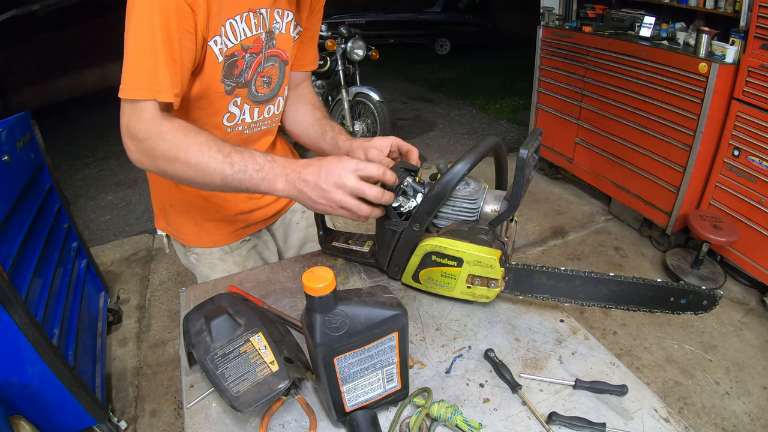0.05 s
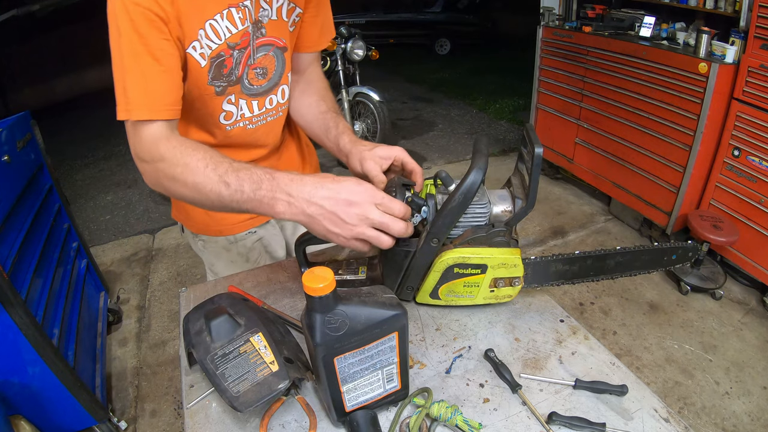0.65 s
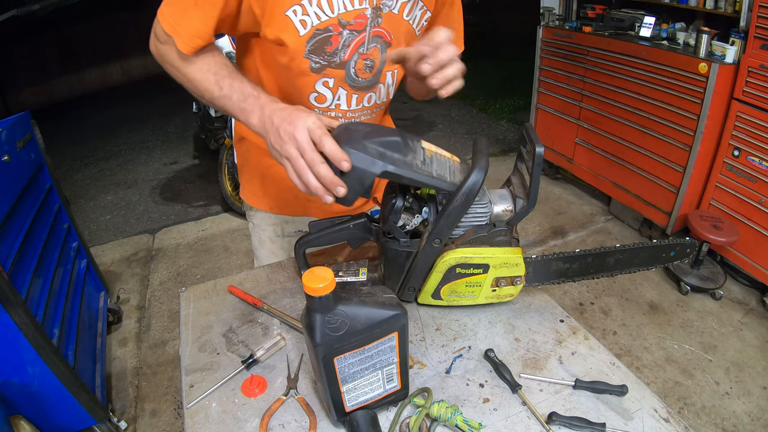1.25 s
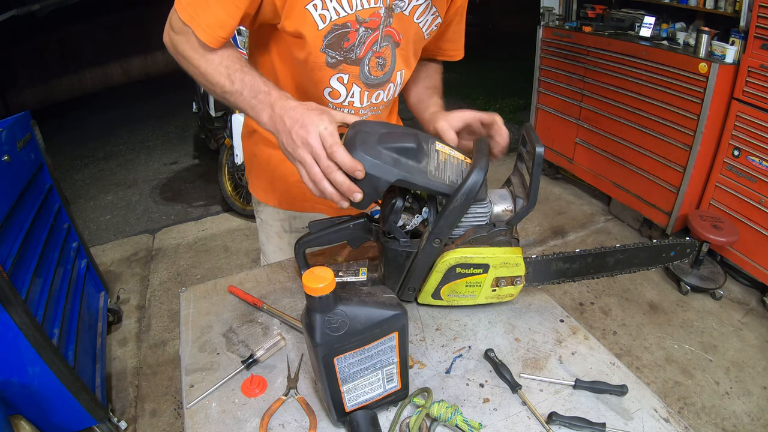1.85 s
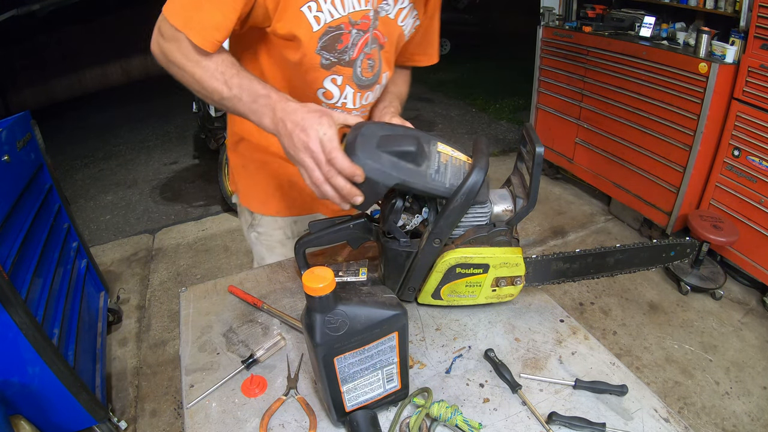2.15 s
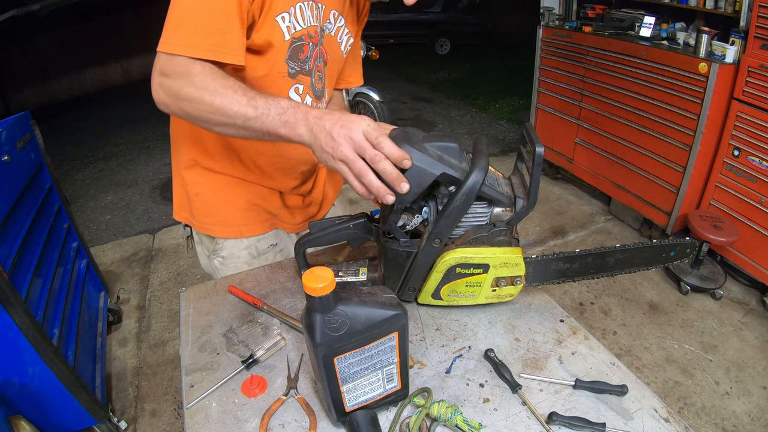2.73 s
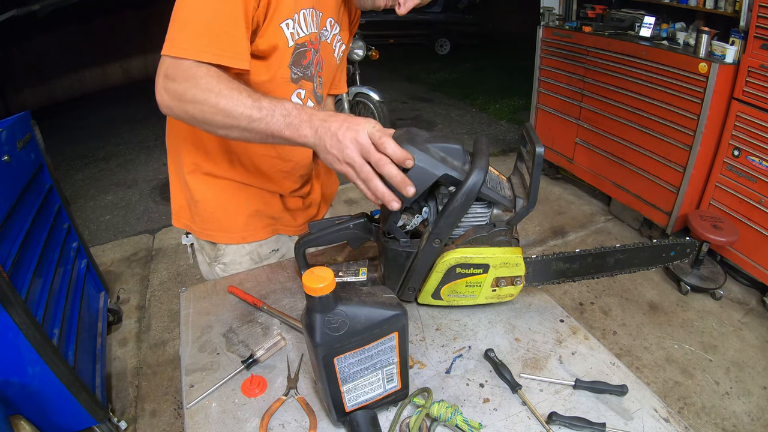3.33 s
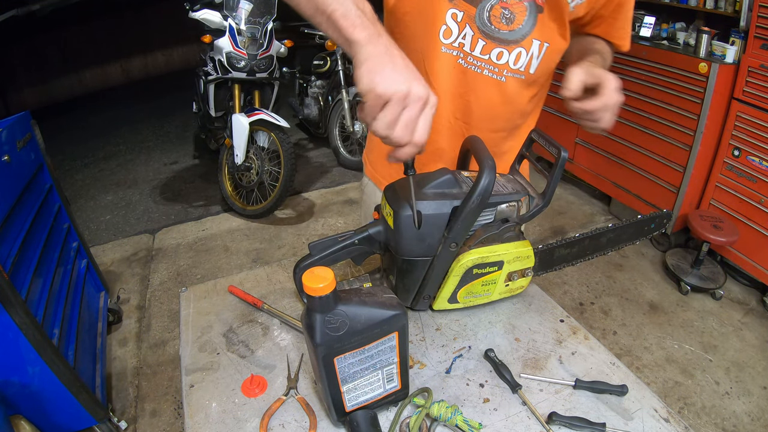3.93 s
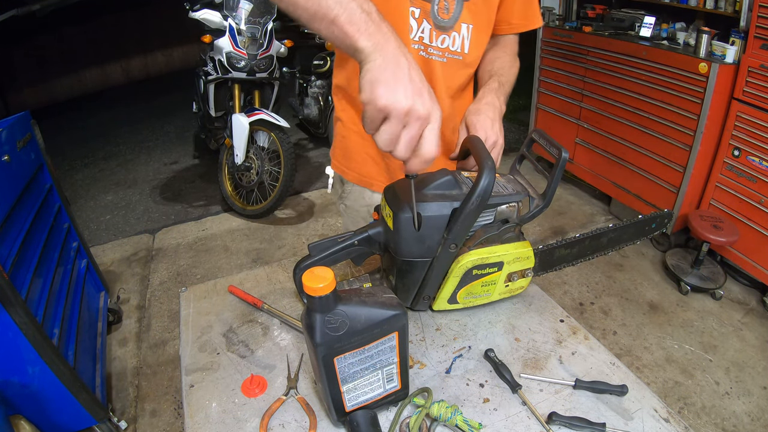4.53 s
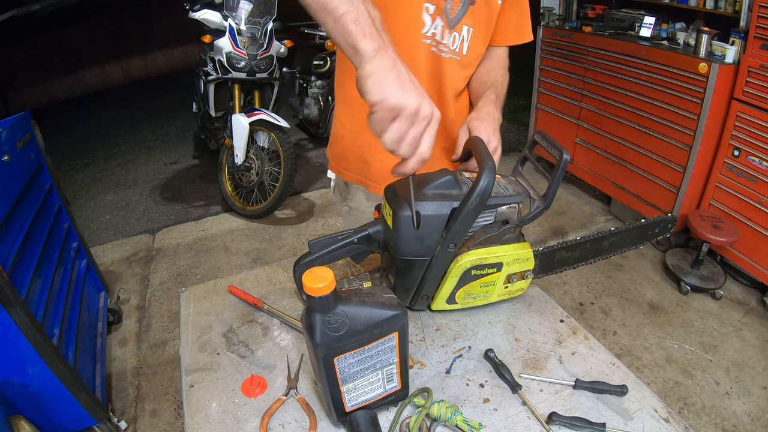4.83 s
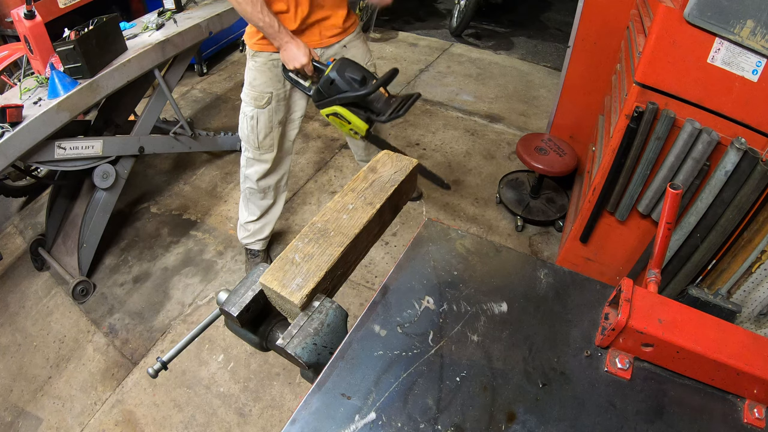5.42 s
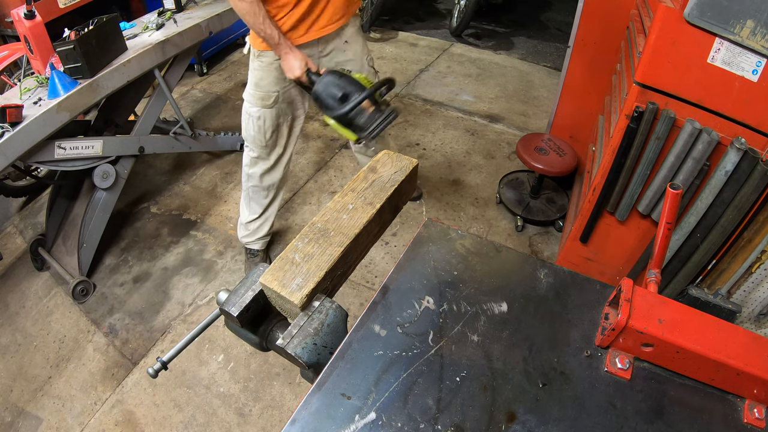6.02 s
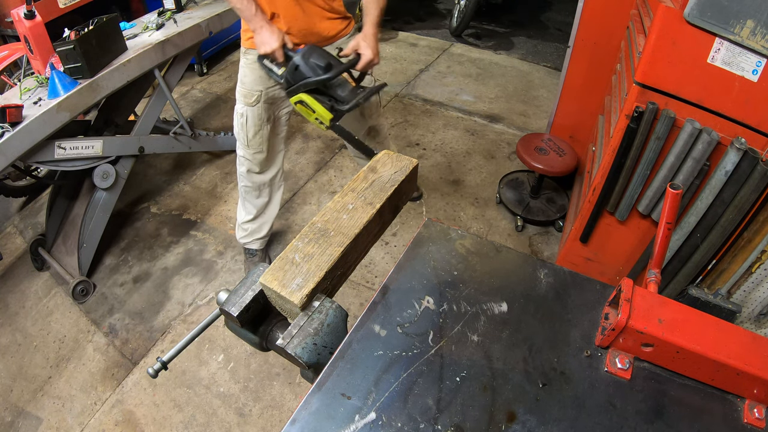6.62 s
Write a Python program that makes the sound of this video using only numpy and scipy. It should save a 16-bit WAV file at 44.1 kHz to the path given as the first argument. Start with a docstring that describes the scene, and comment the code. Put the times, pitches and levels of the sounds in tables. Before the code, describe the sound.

A faint, low hum of air fills a garage with a short echo. From the start, a plastic cover is handled on a chainsaw nearby, with light ticks and soft rubs. Sharp, hollow clacks come at about 1.3 and 2.1 seconds, followed by squeaky scrapes, more knocks and dull bumps of the saw on the bench until 3 seconds. From about 3.5 to 5 seconds the cover is screwed down with small clicks and quiet scraping, a low thump near 3.7 and a sharp knock at 5.1. At 5.3 seconds the starter cord is pulled: the engine chuffs and rattles without firing, and the cord winds back with a thin whizz. A clunk and a second, stronger pull follow at 5.9. Around 6.2 seconds the two-stroke engine catches and runs at a loud, fast idle with rattling casing and chain until the end, near 6.7 seconds.

```python
"""A two-stroke chainsaw starts in a garage: the first pull of the cord only chuffs and the cord winds
back; on the second the engine catches and runs at a fast, rattling idle. Each turn of the engine sends
a puff of gas through the muffler and shakes the metal casing and the chain.
Before the pulls, a plastic cover is fitted and screwed down: knocks make it ring, rubbing parts scrape
and squeak, and the saw bumps on the bench. The walls echo over a faint hum of air."""
import sys
import numpy as np
from scipy import signal
from scipy.fft import rfft, irfft
from scipy.io import wavfile
from scipy.ndimage import uniform_filter1d

SR = 44100
rng = np.random.default_rng(int(sys.argv[2]) if len(sys.argv) > 2 else 0)


def master(y):
    """Save y as 16-bit WAV."""
    cut = np.clip(np.atleast_2d(y).T, -1, 1)
    pcm = np.round(cut * 32767)  # scale
    wavfile.write(sys.argv[1], SR, pcm.astype(np.int16))


N = 294147
T = np.arange(N) / SR


def engine():
    """The turning engine makes three sounds: unfired chuffs, fired barks and a metal rattle."""
    speed, burn, uneven, exhaust_db, rattle_db = crank()
    pulses = exhaust_pulses(speed, uneven)
    gas = signal.fftconvolve(pulses, np.exp(-T[:2048] / .009))[:N]  # the flow dies away after each puff
    chuff = amp(exhaust_db) * unfired_chuff(pulses, gas, burn, uneven)
    bark = amp(exhaust_db - .5) * fired_bark(pulses, burn)
    return chuff, bark, casing_rattle(pulses, gas, burn, rattle_db)


# Pulls of the starter cord: t/s, spin-up/s, hold/s, coast/s, first speed/Hz, top speed/Hz,
# exhaust level/dB, rattle level/dB, surge depth/dB (a speed in Hz is turns a second)
PULLS = [(5.27, .04, .075, .27, 50.25, 64.1, -21, -36, 3.2),
         (5.913, .085, .08, .5, 41.96, 75.05, -18, -30.5, 0.23)]
# The engine under its own power: t/s, speed/Hz
IDLE_SPEED = [(6.25, 76), (6.286, 82.3), (6.33, 87.3), (6.424, 86), (6.544, 84.3), (6.624, 80.8),
              (6.67, 85)]
SURGE_HZ, SURGE_LAG_S = 9.6, 0.02  # a jerky pull comes in surges
CRANK_HZ = 71.9  # the speed at which the levels of the pulls apply
CATCH_S, CATCH_RISE_S = 6.155, .11  # the fuel starts to burn; time until the engine carries itself
SMOOTH_HZ, IDLE_EXHAUST_DB, IDLE_RATTLE_DB = 86.52, -15, -24  # smooth running and its levels


def crank():
    """A pull spins the engine up and lets it coast, until the fuel catches (burn goes from 0 to 1)."""
    speed, exhaust_db, rattle_db = np.zeros((3, N))
    for s, rise, hold, coast, first_hz, top_hz, puff_db, shake_db, surge_db in PULLS:
        i = int(s * SR)
        t = T[:N - i]
        speed[i:] = np.interp(t, np.cumsum([0, rise, hold, coast]), [first_hz, top_hz, top_hz, 0])
        surge = surge_db * np.cos(2 * np.pi * SURGE_HZ * (t - SURGE_LAG_S))
        exhaust_db[i:], rattle_db[i:] = puff_db + surge, shake_db + surge
    caught = np.clip((T - CATCH_S) / CATCH_RISE_S, 0, 1)
    speed = (1 - caught) * speed + caught * np.interp(T, *np.transpose(IDLE_SPEED))
    burn = caught ** 2
    # Pulled, it gets louder and stumbles more with speed. Running, it stumbles more as the speed sags.
    doublings = np.log2(speed / CRANK_HZ + 1e-9)
    sag_hz = np.maximum(SMOOTH_HZ - speed, 0)
    uneven = (1 - burn) * .7 * (speed / CRANK_HZ) ** 2 + burn * .022 * sag_hz
    exhaust_db = (1 - burn) * (exhaust_db + 11 * doublings) + burn * IDLE_EXHAUST_DB
    rattle_db = (1 - burn) * (rattle_db + 9.5 * doublings) + burn * (IDLE_RATTLE_DB - 0.56 * sag_hz)
    return speed, burn, uneven, exhaust_db, rattle_db


def exhaust_pulses(speed, uneven, stall_hz=18):
    """One pulse each time the exhaust opens; a stumbling engine also blows between turns."""
    out = np.zeros(N + SR // 10)
    for s, *_ in PULLS:
        for late, strong, extra, when in rng.standard_normal((80, 4)):
            i = int(s * SR)
            if i >= N or speed[i] < stall_hz:
                break
            period = np.exp(.13 * uneven[i] * late) / speed[i]
            out[i] += amp((-1.3 + 2.8 * uneven[i]) * strong)
            between = i + int(SR * period * (.5 + .2 * np.tanh(when)))
            out[between] += .6 * uneven[i] * np.tanh(extra)
            s += period
    return out[:N]


# Tone of a fired puff: f/Hz, level/dB
BARK_TONE = [(40, -13), (85, -0.5), (125, -20), (172, -2.5), (255, 1), (340, -7.5), (425, -4), (510, -8),
             (600, -18), (690, -26), (860, -21.5), (1000, -44), (1400, -37), (2200, -23.5), (4000, -30)]
# Notes that build up between floor, walls and cabinets: f/Hz, width/Hz, level/dB
ROOM_NOTES = [(119, 11, 1), (195, 39, 7.5), (262.4, 4.2, 10.5), (333.7, 3.2, 10.5), (421.5, 9.9, 3.5),
              (481.5, 24, 9.5), (595.4, 5.5, 12), (668, 16, 17), (770, 15, 10.5), (863.6, 9.7, 14.5)]


def fired_bark(pulses, burn):
    """Puffs of burnt fuel ring the muffler and set the room ringing too."""
    bark = band(colour(-pulses, BARK_TONE), 20, 3800, order=3)
    return np.sqrt(burn) * steady(bark + ring(bark, ROOM_NOTES))


# Tone of an unfired puff: f/Hz, level/dB
CHUFF_TONE = [(24, -75), (40, 1), (69, -6), (144, -1.5), (182, 5), (238, -5.5), (346, 5), (426, -5),
              (480, -0.5), (548, -9), (600, -4.5), (994, -23), (1400, -40), (1820, -42), (3080, -120)]


def unfired_chuff(pulses, gas, burn, uneven):
    """Unfired turns puff and suck air back; swirling gas adds a rush that stays on at idle."""
    intake = np.interp(T - .0055, T, pulses)
    puffs = np.sqrt(1 - burn) * steady(colour(0.14 * intake - pulses, CHUFF_TONE))
    swirl = (0.037 + 0.74 * uneven) * steady(colour(gas * rng.standard_normal(N), CHUFF_TONE))
    return puffs + swirl


def muffler(x, hz, width_hz):
    """Plates in the muffler delay the low part of each puff, smearing it without making it quieter."""
    return x - 2 * ring(x, [(hz, width_hz, 0)])


# Tone of the metal casing: f/Hz, level/dB
CASING_TONE = [(410, -13.5), (700, -2.5), (728, -10), (757, -2), (873, 0.5), (943, -9), (1160, -1.5),
               (1300, -2.5), (2110, -1.5), (2690, -7), (3540, -4), (4030, -8.5), (6590, -10), (8880, -14.5),
               (15500, -42)]
# Notes the casing rings at: f/Hz, width/Hz, level/dB
CASING_NOTES = [(1770, 48, -25), (2100, 48, -6), (2330, 80, -1), (3443, 390, -8), (6500, 91, -5)]


def casing_rattle(pulses, gas, burn, level_db):
    """Piston and chain slap the casing at the same point of each turn, with loose chatter between."""
    t = T[:2048]
    slap = signal.fftconvolve(pulses, rng.standard_normal(len(t)) * np.exp(-t / 0.012))[:N]
    chatter = grains(N, 2.8) * (2.8 + gas * (0.23 + burn))
    metal = colour(steady(chatter) + (0.12 + 0.77 * burn) * steady(slap), CASING_TONE)
    metal = metal + ring(metal * burn, CASING_NOTES)  # only fired turns hit hard enough to ring it
    metal = band(metal, 750, 16000)
    dull = signal.sosfiltfilt(signal.butter(3, 4700, fs=SR, output="sos"), metal)
    return amp(level_db - 2.5) * steady(dull) + amp(level_db - 10) * steady(metal - dull)


# Jerks of the starter catches, cord and chain: t/s, length/s, level/dB, ring f/Hz, ring level/dB
CLATTERS = [(5.273, 0.0097, -31, 6060, -19.5), (5.36, 0.012, -28, 6170, -3),
            (5.455, 0.029, -36, 6980, 11.5), (5.535, .06, -33.5, 7200, 0), (5.757, 0.019, -40.5, 7800, -4),
            (5.8738, .012, -24.5, 6300, -5), (6.078, 0.013, -31, 6400, -16), (6.139, 0.014, -27, 6640, -3),
            (6.188, 0.015, -26.5, 6650, -12), (6.238, 0.016, -21.5, 6200, -6)]
TREMBLE_DB, TREMBLE_S = -7, 0.098  # the slack chain trembles on after each burst


def clatters():
    """The starter's catches and the slack chain rattle in short bursts, with a thin steel ring."""
    out, t = np.zeros(N), T[:SR // 3]
    for s, length, db, hz, ring_db in CLATTERS:
        hits = grains(len(t), 2.3)
        after = np.maximum(t - length, 0)
        burst = np.maximum(np.exp(-after / 0.0046), amp(TREMBLE_DB) * np.exp(-after / TREMBLE_S))
        steel = unit(band(ring(hits, [(hz, 350, 0)]), 1900, 7200, order=3))
        steel *= amp(ring_db) * np.exp(-t / 0.0071)
        add(out, s, amp(db - 1) * (unit(colour(hits, CASING_TONE)) * burst + steel))
    return out


# The cord running back into its housing: t/s, length/s, level/dB
REWINDS = [(5.443, 0.017, -38), (5.531, 0.06, -35), (5.752, .018, -40.5)]


def cord():
    """A spring winds the cord back through its guide with a bright whizz."""
    whizz = unit(band(ring(grains(N, 2.0), [(7000, 1600, 0)]), 1900, 9300, order=4))
    return whizz * swells(REWINDS, attack_s=.004, release_s=0.0089)


# Knocks of plastic and screwdriver: t/s, relative level/dB, main ring f/Hz, body level/dB, snap level/dB
KNOCKS = [(0.259, -34, 1590, 1.5, -2), (.83, -42, 1920, -16, -24), (1.049, -42.5, 1500, -10, -16.5),
          (1.212, -31.5, 2250, -9, -14), (1.274, -17.5, 1980, -21, -20.5),
          (1.298, -12.5, 2530, -16.5, -12.5), (1.423, -30.5, 2200, -12, -25), (1.555, -30, 1050, -4.5, -39),
          (2.059, -38.5, 1970, 9, -21), (2.089, -18.5, 2400, -1, -13), (2.094, -13, 2300, -11, -14),
          (2.295, -16, 1890, -10, -15), (2.346, -21.5, 1500, -10, -28), (2.362, -18.5, 2310, -6, -17),
          (2.756, -32.5, 640, 4, -4.5), (2.771, -25.5, 1520, -25, -19), (2.862, -16.5, 1640, -11.5, -14),
          (2.998, -23.5, 3480, -9, -5), (3.257, -34, 1400, -1, -28), (3.502, -35.5, 2230, 0, -18),
          (3.618, -22, 2070, -41, -17), (3.892, -43, 1110, 9, -28), (3.91, -32, 1020, -2, -19),
          (4.354, -37, 1180, 0, -25), (4.711, -35, 2020, 2, -8.5), (5.092, -14, 2070, -10, -11),
          (5.172, -28.5, 2750, -5.5, -16)]
# Notes the plastic cover rings at: f/Hz, width/Hz, level/dB
COVER_NOTES = [(370, 32, 7), (734, 710, -1.5), (1125, 470, 5.5), (1444, 170, 11.5), (2080, 610, 12.5),
               (2690, 380, -10), (3750, 150, -26), (6050, 6600, -28.5)]
# Notes of the hollow housing under the cover: f/Hz, width/Hz, level/dB
HOUSING_NOTES = [(1128, 60, 5), (1238, 68, 6.5), (1790, 280, -2), (2001.4, 320, -1.5), (2436, 160, -6),
                 (2727, 110, -1), (3660, 50, -24)]


def knocks():
    """Each knock is a brief crack that rings cover and housing; where it lands picks the main ring."""
    out, t = np.zeros(N), T[:8192]
    # each scrape snags once, at a random moment, and adds a small knock
    snags = [(s + length * rng.random(), db + 11.5, hz, -3, -13) for s, length, db, hz, _ in SCRAPES]
    for s, db, hz, body_db, snap_db in KNOCKS + snags:
        contact_s = 0.0018 * 2 ** ((-17 - db) / 18)  # harder knocks are shorter
        chatter = amp(-15) * np.exp(-t / (6.3 * contact_s))
        crack = rng.standard_normal(len(t)) * (np.exp(-t / contact_s) + chatter)
        shell = ring(crack, COVER_NOTES) + amp(4.5) * ring(crack, HOUSING_NOTES)
        body = amp(body_db) * unit(band(shell, 172, 780, order=3))
        clack = unit(band(ring(shell, [(hz, 0.55 * hz, 0)]) + 0.6 * shell, 910, 3690, order=4))
        snap = amp(snap_db) * unit(band(shell, 3400, 6800, order=3))
        add(out, s, amp(db - 27) * (body + clack + snap))
    return out


# Rubs of hands, plastic and turning screws: t/s, length/s, level/dB, squeak f/Hz, hiss level/dB
SCRAPES = [(0.185, 0.043, -57, 1880, -5.5), (0.31, .25, -55, 990, -10.5), (0.878, 0.13, -55, 1560, -4),
           (1.129, 0.11, -63, 2400, -5), (1.298, 0.035, -55, 1130, -17), (1.408, 0.014, -50, 2260, -13),
           (1.69, 0.046, -57, 2360, -19), (2.109, 0.34, -49.5, 686, -15.5),
           (2.299, 0.06, -34.5, 1677, -20.5), (2.505, 0.057, -40, 1520, -18),
           (2.578, 0.24, -55.5, 1620, -10), (2.701, 0.058, -45.5, 1160, -16.5),
           (2.983, 0.038, -46, 1450, -32), (3.046, 0.28, -67.5, 3700, -2), (3.242, 0.025, -49.5, 1330, -20),
           (3.381, 0.037, -49.5, 2970, -10), (3.552, 0.088, -58.5, 2940, -8.5),
           (3.646, 0.058, -52.5, 2540, -9.5), (3.944, 0.19, -56, 2940, -10.5),
           (4.108, 0.089, -57, 2220, -3.5), (4.397, 0.14, -58.5, 2164, -13.5),
           (4.529, 0.077, -44.5, 1970, -10), (4.773, 0.094, -49.5, 1720, -7)]
# Tone of rubbed plastic: f/Hz, level/dB
RUB_TONE = [(150, -18), (250, 9), (296, -1), (356, 6.5), (421, -8), (474, 4.5), (962, 0.5), (1200, -7.5),
            (1350, 2), (2160, -4), (4380, -12), (7260, -46), (14000, -60)]


def scrapes():
    """Plastic sticks and slips in short rubs, which squeak, hiss and ring the housing."""
    out = np.zeros(N)
    for s, length, db, hz, hiss_db in SCRAPES:
        t = T[:int(2 * length * SR)]
        slips = stick_slip(len(t), rate_hz=700, spread_db=1.5)
        rub = colour(slips, RUB_TONE)
        squeak = unit(ring(rub, [(hz, 260, 0)]))
        hollow = unit(band(ring(slips, HOUSING_NOTES), 320, 2700))
        plastic = unit(squeak + 1.35 * hollow + 1.7 * unit(rub))
        hiss = amp(hiss_db) * unit(band(grains(len(t), 1.3), 2050, 7520, order=3))
        add(out, s, amp(db + 0.3) * rub_pressure(t, length) * (plastic + hiss))
    return out


def stick_slip(count, rate_hz, spread_db):
    """Scattered slips at random moments, over a little smooth sliding."""
    slips = (rng.random(count) < rate_hz / SR) * amp(spread_db * rng.standard_normal(count).clip(-2, 2))
    return unit(unit(slips * np.sign(rng.standard_normal(count))) + 0.48 * rng.standard_normal(count))


def rub_pressure(t, length, attack_s=0.012, ease_db=-3, grip_db=1.5, grip_s=0.0108):
    """One rub bites, eases off and fades, while the grip keeps catching and letting go."""
    catches = np.arange(0, t[-1] + grip_s, grip_s)
    grip = np.interp(t, catches, rng.standard_normal(256)[:len(catches)].clip(-2, 2))
    fade = np.exp(-np.maximum(t / length - 1, 0) / 0.27)
    return np.clip(t / attack_s, 0, 1) * fade * amp(ease_db * t / length + grip_db * grip)


# Bumps of the saw's body, and a knock of the starter cord at 5.8 s: t/s, f/Hz, time to fade by 60 dB/s,
# level/dB
BUMPS = [(2.096, 141, 0.22, -39), (2.098, 370, 0.11, -36), (2.755, 587, 0.015, -24),
         (2.782, 145, 0.215, -38.5), (3.007, 151, 0.21, -35.5), (3.64, 303, 0.053, -29.5),
         (3.667, 138.7, 0.39, -28.5), (3.91, 460, 0.055, -36), (4.72, 454, 0.019, -31),
         (5.802, 402, 0.093, -35), (5.873, 375, 0.14, -26), (5.874, 1125, 0.024, -18)]


def bumps():
    """The saw's body bumps on the bench and the starter cord knocks, each time with one dull, fading note."""
    out, t = np.zeros(N), T[:SR // 3]
    for s, hz, fade_s, db in BUMPS:
        add(out, s, amp(db - 1) * np.sin(2 * np.pi * hz * t) * np.exp(-np.log(1000) * t / fade_s))
    return out


# The saw rocking under the hands: t/s, length/s, level/dB
ROCKS = [(0.296, 0.21, -49), (2.062, 0.5, -45.5), (2.757, 0.074, -50.5), (3.343, 0.15, -52),
         (3.604, 0.086, -46), (4.732, 0.12, -50.5), (5.066, 0.081, -55)]
# Tone of the bench: f/Hz, level/dB
BENCH_TONE = [(41, -44.5), (70, 6), (140, 0), (179, -7), (261, -1), (301, -15), (350, -10), (800, -22),
              (1040, -39), (1760, -120)]


def bench_rumble(resting_db=-65.5):
    """Until the first pull, the saw rumbles on the bench as it rocks, and faintly under resting hands."""
    rocking = amp(resting_db) + swells(ROCKS, attack_s=0.019, release_s=0.065)
    return amp(1.5) * rocking * (T < PULLS[0][0]) * wide_noise(BENCH_TONE, width=0.66)


# The garage's echo: f/Hz, time to fade by 60 dB/s
ECHO_TIMES = [(150, 0.34), (700, 0.33), (2500, 0.16), (7000, 0.33), (14000, 0.27)]


def garage(x, echo_db, pan_db):
    """The direct sound plus its echo, whose left and right sides differ more at higher pitch."""
    t = T[:SR // 2]
    tail = 0
    for hz in 62.5 * 2 ** np.arange(9):
        fade_s = np.interp(hz, *np.transpose(ECHO_TIMES))
        apart = min(hz / 1400, 1.3)
        mid, side = band(rng.standard_normal((2, len(t))), hz / np.sqrt(2), hz * np.sqrt(2))
        pair = (mid + apart * side * np.array([[1], [-1]])) / np.hypot(1, apart)
        tail = tail + pair * np.exp(-np.log(1000) * t / fade_s)
    tail *= np.clip(t / 0.0024, 0, 1) / np.sqrt(SR * 0.026)
    echo = signal.fftconvolve(x[None], tail, axes=1)[:, :N]
    return x * amp(np.array([[pan_db], [-pan_db]]) / 2) + amp(echo_db) * echo


# Tone of the garage's air: f/Hz, level/dB
AIR_TONE = [(13, -31), (22, 0.5), (70, 4.5), (171, -1.5), (204, -9), (526, -38), (834, -17), (1050, -28),
            (1320, -22.5), (2260, -30.5), (3240, -31.5), (7350, -43), (10000, -49.5), (13000, -75),
            (22000, -120)]


def still_air():
    """The quiet garage is a faint, low, even noise."""
    return amp(-53.5) * wide_noise(AIR_TONE, width=0.75)


def amp(db):
    """Turn decibels into a gain."""
    return 10 ** (np.asarray(db) / 20)


def unit(x):
    """Scale a sound to an average strength (rms) of 1."""
    return x / (x.std() + 1e-12)


def steady(x, size=3000):
    """Even out the loudness while keeping the single pulses."""
    power = uniform_filter1d(x ** 2, size)
    return x / np.sqrt(np.abs(power) + 1e-3 * power.max())


def band(x, lo_hz, hi_hz, order=2):
    """Keep what lies between two frequencies."""
    sos = signal.butter(order, [lo_hz, min(hi_hz, SR / 2 - 100)], "band", fs=SR, output="sos")
    return signal.sosfilt(sos, x + 1e-18)


def ring(x, notes):
    """Let a sound ring a set of notes: f/Hz, width/Hz, level/dB."""
    return sum(amp(db) * signal.lfilter(*signal.iirpeak(hz, hz / width, SR), x + 1e-18)
               for hz, width, db in notes)


def colour(x, tone, size=4096):
    """Give a sound a tone (f/Hz, level/dB), falling 18 dB an octave beyond the table's ends."""
    hz, db = np.transpose(tone)
    f = np.maximum(np.fft.rfftfreq(size, 1 / SR), 1)
    outside = np.maximum(np.log2(f / hz[-1]), 0) + np.maximum(np.log2(hz[0] / f), 0)
    cepstrum = irfft(np.log(amp(np.interp(np.log(f), np.log(hz), db) - 18 * outside)))
    cepstrum[1:size // 2] *= 2  # folded so that the filter rings only after a hit, never before
    cepstrum[size // 2 + 1:] = 0
    return signal.fftconvolve(x, irfft(np.exp(rfft(cepstrum))))[:len(x)]


def grains(count, spread_db, size=24):
    """Friction noise: tiny slips of unequal strength."""
    slips = np.repeat(np.clip(rng.standard_normal(count // size + 1), -2, 2), size)[:count]
    return unit(rng.standard_normal(count) * amp(spread_db * slips))


def wide_noise(tone, width):
    """Stereo noise with a given tone; width sets how much left and right differ."""
    mid, side = (unit(colour(rng.standard_normal(N), tone)) for _ in range(2))
    return mid + width * side * np.array([[1], [-1]])


def swells(events, attack_s, release_s):
    """A loudness curve that rises, holds and dies away for each event: t/s, length/s, level/dB."""
    return sum(amp(db) * np.clip((T - s) / attack_s, 0, 1)
               * np.exp(-np.maximum(T - s - length, 0) / release_s) for s, length, db in events)


def add(track, s, sound):
    """Mix a sound in at s seconds."""
    i = int(s * SR)
    track[i:i + len(sound)] += sound[:N - i]


def scene():
    """The saw and the bench work before it, echoing in the garage over its still air."""
    chuff, bark, rattle = engine()
    air = still_air()
    bench = garage(knocks(), echo_db=-2.5, pan_db=-3)
    bench += garage(scrapes() + bumps(), echo_db=-1.5, pan_db=-3) + bench_rumble()
    exhaust = garage(muffler(chuff, hz=334, width_hz=350), echo_db=-3.5, pan_db=-1)
    exhaust += garage(muffler(bark, hz=242, width_hz=114), echo_db=-15, pan_db=0.1)
    # the higher part of the bark also comes back off the walls
    walls = amp(-11.5) * garage(band(bark, 584, 4200, order=3), echo_db=11.5, pan_db=-4)
    moving_parts = garage(amp(0.5) * (rattle + clatters() + cord()), echo_db=-2, pan_db=-1.35)
    return exhaust + walls + moving_parts + bench + air


def record(dry, top_hz=15600):
    """Round off the loudest peaks and cut the highest treble."""
    rounded = dry / (1 + (dry / .65) ** 4) ** .25
    return signal.sosfilt(signal.ellip(8, .2, 70, top_hz, fs=SR, output="sos"), rounded)


dry = scene()
out = record(dry)
master(out)
```